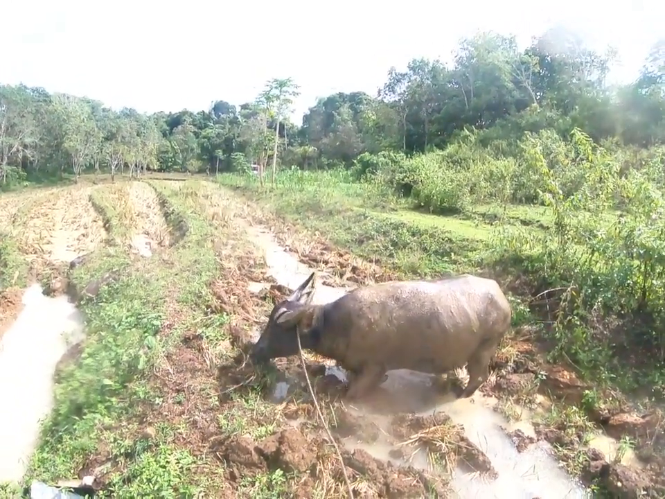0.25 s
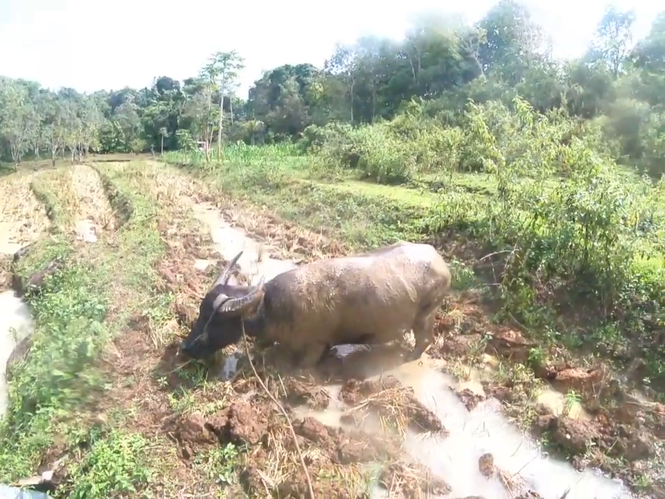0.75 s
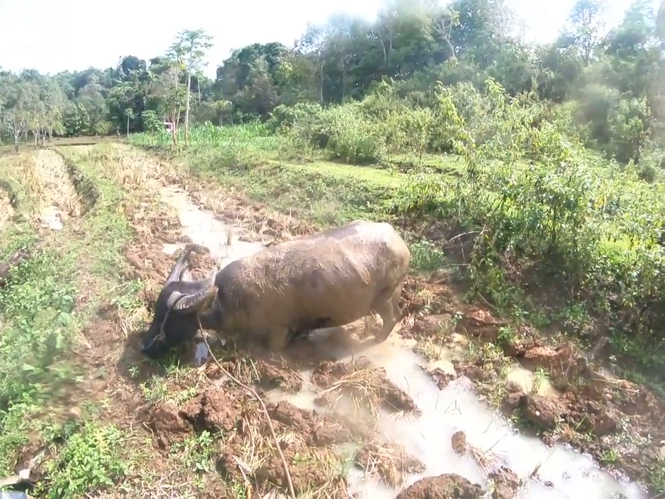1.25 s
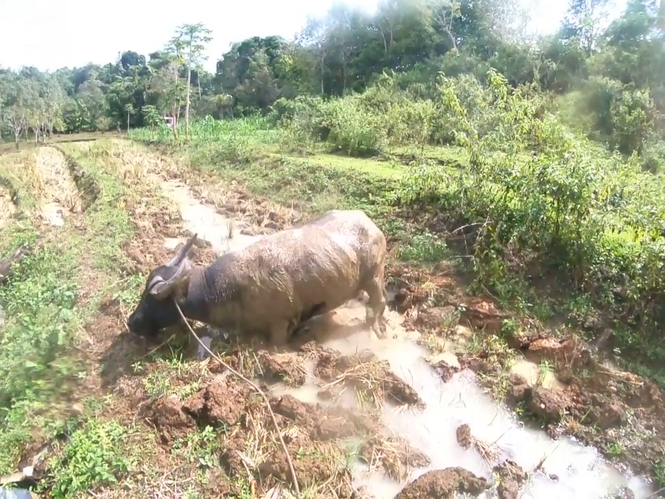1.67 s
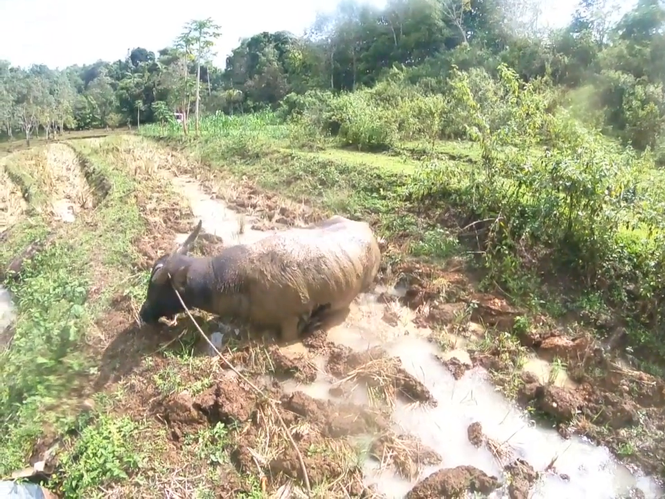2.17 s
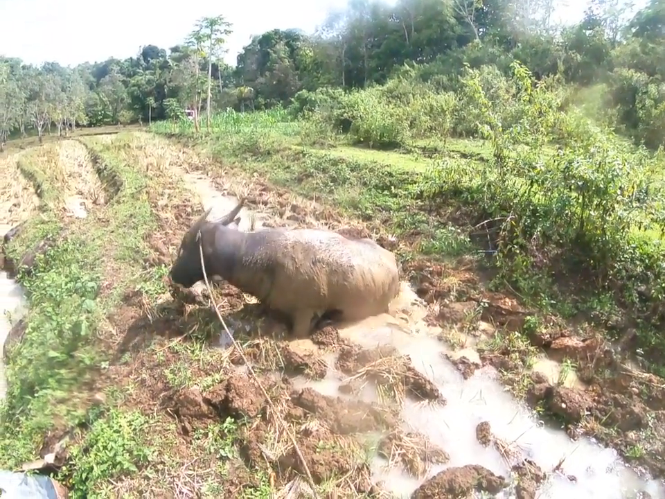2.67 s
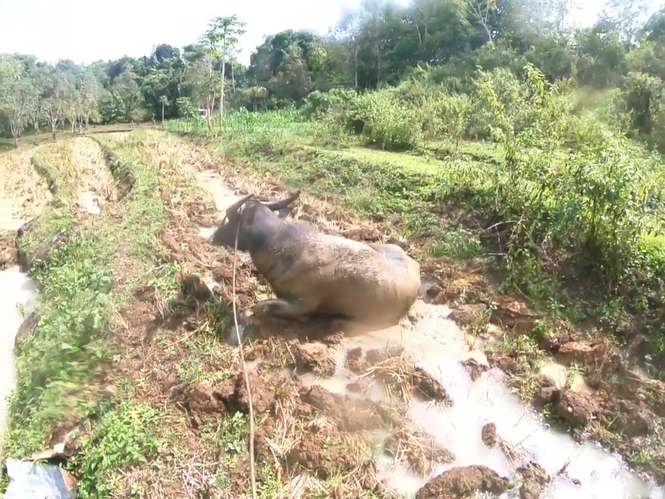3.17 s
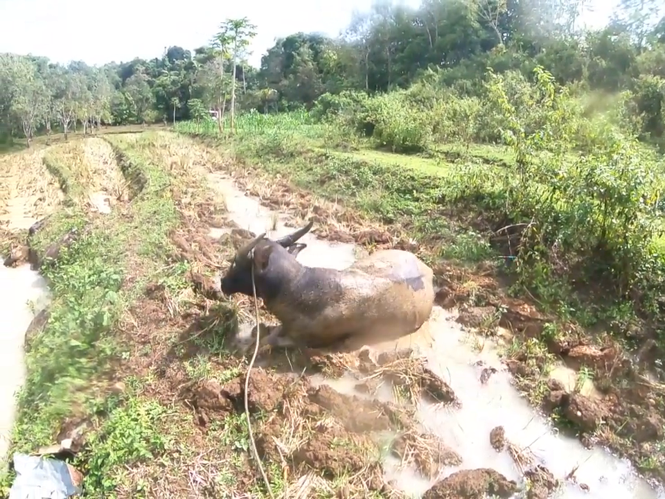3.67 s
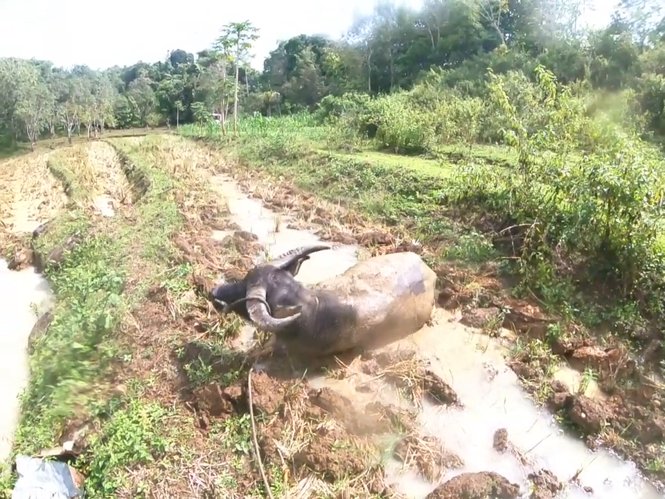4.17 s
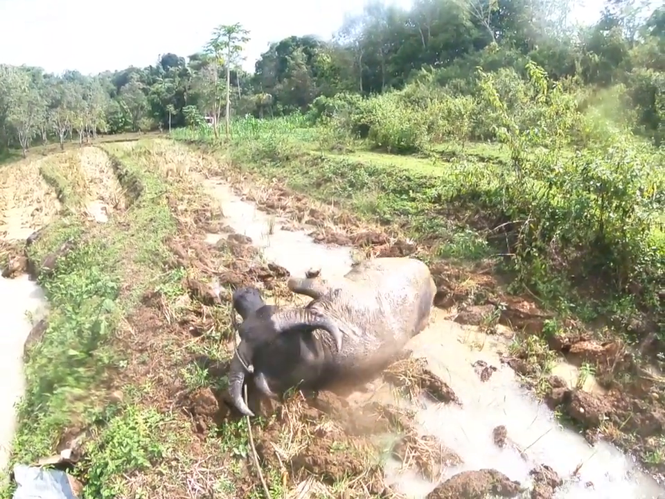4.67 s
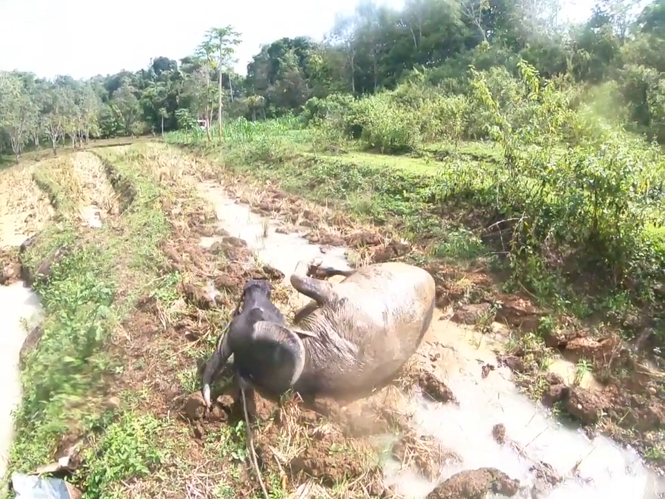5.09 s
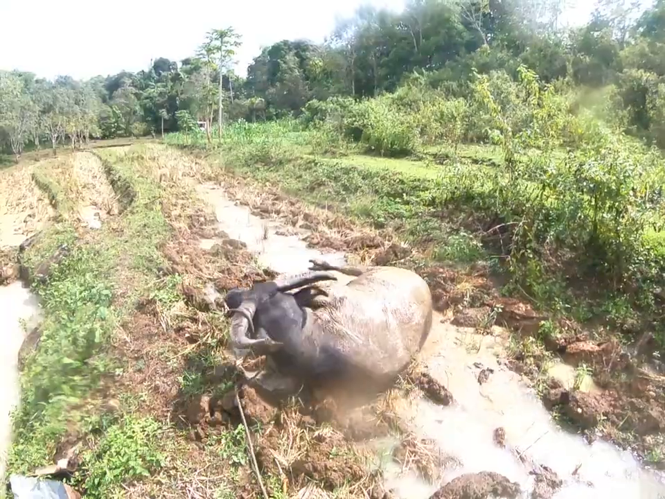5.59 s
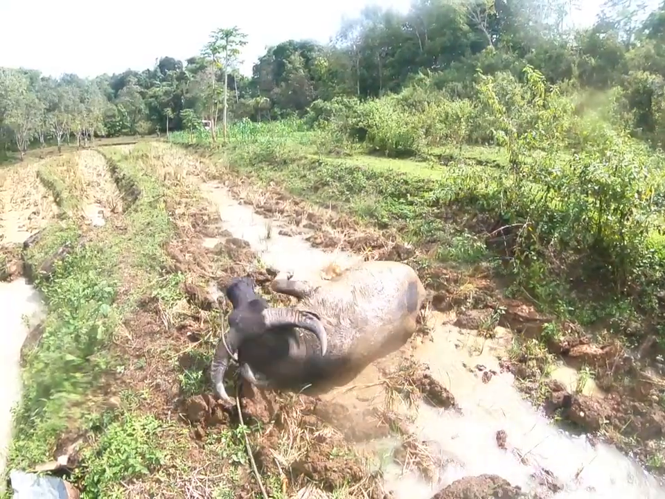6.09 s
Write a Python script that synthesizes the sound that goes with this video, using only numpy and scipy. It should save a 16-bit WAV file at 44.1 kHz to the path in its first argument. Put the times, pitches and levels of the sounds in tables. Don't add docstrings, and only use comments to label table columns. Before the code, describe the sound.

Heavy animal wallowing in shallow muddy water outdoors: churning slosh, sharp splashes, sucking plops and flung drops, with low wind buffeting.

```python
import sys
import numpy as np
from scipy import signal
from scipy.fft import rfft, irfft, next_fast_len
from scipy.io import wavfile
from scipy.ndimage import uniform_filter1d

SR = 44100
rng = np.random.default_rng(int(sys.argv[2]) if len(sys.argv) > 2 else 0)


def voltage_ratio(level):
    return 10 ** (np.asarray(level, float) / 20)


def digitize_waveform(pressure):
    field = np.atleast_2d(pressure).T
    bounded = np.clip(field, -1, 1)
    quanta = np.round(bounded * 32767).astype(np.int16)
    wavfile.write(sys.argv[1], SR, quanta)


N = 279594
SIZE = next_fast_len(N)
CLOCK = np.arange(N) / SR
BINS = np.fft.rfftfreq(SIZE, 1 / SR)


def evened(x):
    return x / np.sqrt(np.mean(x ** 2) + 1e-20)


def read(points, hz):
    f, value = np.transpose(points)
    return np.interp(np.log(hz + 1), np.log(f + 1), value)


def coloured(x, points):
    return evened(irfft(rfft(x, SIZE) * voltage_ratio(read(points, BINS)), SIZE)[:N])


def add(mix, s, sound):
    part = mix[..., max(round(s * SR), 0):][..., :sound.shape[-1]]
    part += sound[..., :part.shape[-1]]


def lumps(per_s):
    hz = BINS[:SIZE // 32 + 1]
    slow = rfft(rng.standard_normal(SIZE // 16)) / (1 + (hz / per_s) ** 2)
    slow = evened(irfft(slow, SIZE // 16))
    return np.interp(np.arange(N) / 16, np.arange(SIZE // 16), 2 * np.tanh(slow / 1.6))


SINK_DB = 13


def surges(base_db, s, db, rise_s, fall_s):
    u = CLOCK[::64, None] - s
    fade = np.where(u < 0, -u / rise_s, u / fall_s)
    power = voltage_ratio(2 * (db - SINK_DB * fade)).sum(1)
    return 10 * np.log10(np.interp(CLOCK, CLOCK[::64], power) + voltage_ratio(2 * base_db))


def bubble(hz, cycles, glide):
    u = np.arange(int(4 * cycles * SR / hz) + 8) * hz / SR / cycles
    shape = (1 - np.exp(-u * cycles / 0.9)) * np.exp(-2.4 * u ** 2.57)
    turns = cycles * (u + .5 * glide * np.minimum(u, 1.5) ** 2)
    return shape / shape.max() * np.sin(2 * np.pi * turns)


def swarm(low_hz, high_hz, cycles, per_s, spread_db, clump_db, count=16):
    born, kind = rng.random(N) < per_s / SR, rng.integers(0, count, N)
    loudness_db = spread_db * np.minimum(rng.exponential(1, N), 4) + clump_db * lumps(26.0)
    size = born * voltage_ratio(loudness_db)
    out = np.zeros(N)
    for k, hz in enumerate(np.geomspace(low_hz, high_hz, count)):
        grain = bubble(hz, cycles * rng.uniform(0.62, 1.71), rng.uniform(0, 0.26))
        grain = grain * np.sqrt(hz) / np.linalg.norm(grain)
        out += signal.oaconvolve(size * (kind == k), grain)[:N]
    return evened(out)


# (frequency [Hz], level [dB per Hz])
SLOSH_COLOUR = [(150, -30), (250, -2.5), (393, -7.5), (653, 6), (806, 0), (1450, 4.5), (1800, -5.5),
                (3500, -6.5), (4550, -35), (7700, -120)]
# (frequency [Hz], level [dB per Hz])
SPRAY_COLOUR = [(1060, -11), (1800, -0.5), (2120, -0.5), (2400, 0), (5320, 0), (7490, -7), (8580, -15.5),
                (9820, -13), (11700, -34.5), (14300, -35.5), (15600, -52)]
# (time [s], level [dB], spray over slosh [dB], length [s])
PLUNGES = [(0.633, -53, -2, 0.43), (1.365, -45, -15, 0.53), (1.379, -39.5, -9, 0.17),
           (1.812, -42, -6.5, 0.24), (2.452, -51.5, 14.5, 0.27), (2.553, -39.5, 2, 0.054),
           (3.705, -36, 2, 0.062), (4.111, -41, -8, 0.085), (4.48, -50, 0, 0.26), (4.664, -44.5, -1, 0.36),
           (4.961, -45, -1, 0.7), (5.875, -47, -1, 0.093), (5.905, -52.5, 13, 0.11)]
# (crest time [s], level [dB], spray over slosh [dB], length [s])
HEAVES = [(0.986, -48.5, 8, 0.096), (0.31, -64, -2, 0.34), (1.151, -55.5, 6.5, 0.14),
          (1.55, -40, -4.5, 0.12), (1.46, -50, -14, 0.066), (1.949, -36.5, -1.5, 0.067),
          (2.011, -37.5, 6, 0.039), (2.133, -45, 3.5, 0.17), (2.354, -43.5, -31, 0.27),
          (2.594, -52.5, 12, 0.22), (2.803, -38.5, -2, 0.11), (2.905, -35.5, -1, 0.1),
          (3.038, -40, 0.5, 0.26), (3.205, -46.5, 7.5, 0.22), (3.406, -45.5, 8, 0.059),
          (3.479, -40, 9.5, 0.029), (3.556, -40.5, -1, 0.28), (3.832, -44, 1.5, 0.45),
          (4.219, -43, -8.5, 0.15), (4.554, -46.5, 5, 0.042), (4.893, -50, -4, 0.043),
          (5.142, -42, -1.5, 0.037), (5.306, -57.5, 8.5, 0.31), (5.524, -68, -7, 0.36),
          (5.7, -42.5, -2.5, 0.42), (6.04, -43.5, -5, 0.3), (6.28, -37.5, 6, 0.15)]
PLUNGE_S = 0.0099
HEAVE_RISE = 0.78
TRICKLE_DB, MIST_DB = -62.5, -63.5
TICKS, BEADS = .26, .55


def churn():
    slosh = swarm(283.0, 3137, 5.4, 2600, 0.47, 2.44) + 0.92 * rng.standard_normal(N)
    spray = swarm(1536, 10960, 3.24, 5000, 0.52, 3.5) + 1.07 * rng.standard_normal(N)
    spray += TICKS * swarm(1340, 12600, 2.0, 480, 4.1, 3.3, count=6)
    spray += BEADS * swarm(1290, 6140, 5.3, 350, 1.35, 9.0, count=10)
    s, db, spray_db, length = np.transpose(PLUNGES + HEAVES)
    is_plunge = np.arange(len(s)) < len(PLUNGES)
    rise = np.where(is_plunge, PLUNGE_S, HEAVE_RISE * length)
    slosh_db = surges(TRICKLE_DB, s, db, rise, length)
    mist_db = surges(MIST_DB, s, db + spray_db + 0.049, rise, length)
    return voltage_ratio(slosh_db) * coloured(slosh, SLOSH_COLOUR) + voltage_ratio(mist_db) * coloured(spray, SPRAY_COLOUR)


# (time [s], left level [dB], right level [dB])
BREEZE = [
    (0, -52, -49),
    (.44, -49.5, -54.5),
    (1.06, -57, -55),
    (1.9, -49, -50),
    (3.9, -33.5, -41),
    (5.9, -44, -44),
    (6.34, -37.5, -32.5),
]
# (frequency [Hz], level [dB per Hz])
RUMBLE_COLOUR = [(7.1, -40), (12, -7.5), (38, 5), (81, 1), (189, -8), (348, -23), (393, -32), (700, -32.5),
                 (910, -64), (1540, -120)]
# (crest time [s], peak level at the windward port [dB], left over right [dB], length [s])
GUSTS = [(0.67, -42, 0, 0.052), (0.821, -30, 13.5, 0.059), (1, -46.5, -4, 0.052), (1.14, -32.5, 16, 0.076),
         (1.62, -36, 12, 0.2), (1.69, -24.5, 10, 0.48), (2.174, -25, 12, 0.2), (2.447, -23, 21, 0.045),
         (2.537, -24.5, 3, 0.045), (2.681, -25.5, 13, 0.025), (2.776, -30.5, 2.5, 0.11),
         (2.861, -26, 14, 0.13), (2.973, -31, -0.5, 0.15), (3.2, -31, 2.5, 0.19), (3.51, -28, 1.5, 0.31),
         (3.74, -28, 4, 0.11), (4.097, -22.5, 20, 0.065), (4.317, -36.5, -3.5, 1), (4.5, -36.5, 2, 0.25),
         (4.655, -30.5, -19, 0.02), (4.918, -31, 0, 0.22), (5.079, -29.5, -20, 0.067),
         (5.296, -31.5, -20, 0.13), (5.412, -28.5, 19, 0.092), (5.576, -31.5, 5, 0.27),
         (5.93, -35.5, -1, 0.43), (6.207, -27, 5, 0.058)]
# (time [s], peak level [dB], pitch [Hz], left over right [dB])
EDDIES = [(.205, -50, 170, 7), (0.31, -50, 190, -1), (0.501, -58, 180, 3), (0.653, -45, 192, -3),
          (0.72, -39, 150, 4), (0.954, -41, 200, -2), (0.814, -33, 130, 15), (1.087, -36, 150, 23),
          (1.102, -32, 131, 16), (1.541, -32, 74.6, 14), (1.656, -23, 113, 14), (1.679, -24, 75.4, 14),
          (1.708, -15.5, 107, 23), (1.738, -19, 162, 8), (1.777, -41, 88, 13), (1.877, -21.5, 142, 19),
          (1.979, -25.5, 175, 17), (2.03, -20, 119, 8), (2.155, -24, 85, 25), (0.796, -35, 110, 10),
          (2.668, -25, 50.4, 15), (2.777, -20, 55, 13), (2.95, -22, 73, 24), (3.2, -20, 69.4, 14),
          (3.45, -19.5, 75.5, 22), (3.558, -22.5, 76, 11), (3.716, -13.5, 82.5, 21),
          (4.062, -21.5, 108, 23), (4.088, -39, 78, 9), (4.645, -24.5, 71.6, -25), (5.289, -24, 84, -22),
          (5.41, -21, 94, 18), (5.451, -20.5, 74, 9), (5.555, -21.5, 71.5, 13), (5.625, -28, 72.4, 28),
          (2.87, -20.5, 76, 20), (3.104, -27, 55, 13)]
EDDY_LOSS_DB = 3


def breeze():
    out = []
    s, db, pan_db, length = np.transpose(GUSTS)
    when, *steady = np.transpose(BREEZE)
    shades = np.minimum(pan_db, 0), np.minimum(-pan_db, 0)
    for steady_db, shade_db in zip(steady, shades):
        port_db = surges(np.interp(CLOCK, when, steady_db), s, db + shade_db, length, length)
        air = coloured(rng.standard_normal(N), RUMBLE_COLOUR)
        upper = irfft(rfft(air, SIZE) * BINS ** 3 / (BINS ** 3 + 76.0 ** 3), SIZE)[:N]
        reach_db = 1.26 * (port_db + 27.5) + 4.8 * lumps(14.0)
        air = air + (voltage_ratio(reach_db) - 1) * upper
        out.append(voltage_ratio(port_db - 1.4 + 3.6 * lumps(30.5)) * air)
    out = np.array(out)
    for s, db, hz, pan_db in EDDIES:
        share = 1 / np.sqrt(1 + voltage_ratio([[-2 * pan_db], [2 * pan_db]]))
        push = rng.choice([-1., 1.], (2, 1))
        add(out, s - .003, 2 * share * voltage_ratio(db - EDDY_LOSS_DB) * push * bubble(hz, 1.29, -0.044))
    return out


# (frequency [Hz], level [dB per Hz])
FIELD_COLOUR = [(105, -16), (170, 5.5), (307, -3.5), (459, -18), (1300, -12.5), (6070, -12.5), (7130, -9.5),
                (10600, -24.5), (12000, -34), (15600, -44)]
FIELD_DB = -54


def field():
    hiss = coloured(rng.standard_normal(N), FIELD_COLOUR)
    return voltage_ratio(FIELD_DB - 7.0 + 0.22 * lumps(9.7)) * hiss


# (time [s], peak level [dB], pitch
# [Hz], length [cycles])
BUBBLES = [(0.957, -34, 2030, 26), (1.216, -30, 1070, 11), (1.393, -16.5, 1338, 5.5), (1.627, -29, 960, 11),
           (1.945, -42, 1520, 8.6), (1.9525, -21.5, 2100, 9.9), (1.998, -27, 2100, 11),
           (2.402, -28, 1380, 9.8), (2.441, -24, 1020, 8.8), (2.658, -25, 960, 7.9), (2.757, -26, 1450, 19),
           (2.811, -17, 903, 5), (2.984, -20, 1430, 9.7), (3, -17, 1235, 12), (3.042, -19, 1500, 6.8),
           (3.224, -26, 1410, 15), (3.483, -26, 2010, 7.3), (3.546, -18, 960, 5.9), (3.696, -25, 1410, 7.7),
           (3.797, -22.5, 1590, 15), (4.136, -22.5, 960, 7.2), (4.474, -28.5, 1450, 16),
           (4.654, -33, 1620, 14), (4.9887, -23.5, 1144, 12), (5.25, -18.5, 1578, 25), (5.677, -24, 1860, 12),
           (5.875, -19.5, 1003, 12), (6.191, -21, 1100, 4.8), (6.284, -17.5, 1650, 7.7),
           (.622, -40.5, 591, 39), (1.365, -27, 260, 4.2), (1.901, -28, 554, 16), (2.368, -27.5, 587, 7.4),
         (2.539, -21, 720, 4.3), (2.556, -17.5, 680, 3.5), (2.571, -19, 164, 1.1), (2.683, -24.5, 554, 8.2),
         (3.118, -27, 785, 8.2), (3.224, -26, 413, 5.1), (3.295, -30, 830, 13), (3.312, -25.5, 646, 4.2),
         (3.467, -23, 547, 3.1), (3.518, -29, 670, 23), (3.539, -20, 720, 6.5), (3.574, -33.5, 610, 37),
         (3.83, -29.5, 563, 11.6), (4.135, -21.5, 553, 1.3), (4.387, -28, 342, 4.8), (4.706, -30, 914, 11),
         (5.689, -33, 540, 4.5), (5.912, -22.5, 660, 8.2), (6.085, -23, 658, 9.2), (1.132, -35, 745, 8.4),
         (1.0, -32, 1090, 13), (1.655, -28, 337, 3.1), (1.668, -24, 435, 3.2), (1.705, -30, 298, 2.1),
         (1.74, -34, 333, 2), (0.039, -45, 400, 4.2), (4.21, -29, 300, 4.3), (3.29, -30.5, 293, 5.9),
         (1.781, -19.5, 256, 3), (5.4, -27, 553, 1.3), (5.452, -31, 250, 2.2),
           (.24, -41.5, 730, 8), (0.648, -37, 1420, 12), (.765, -40, 740, 8), (0.856, -40, 1420, 19),
             (1.093, -37, 1420, 12), (1.319, -42, 2160, 18), (1.3908, -25, 1173, 3.2),
             (1.3913, -22, 1820, 6.1), (1.402, -23, 1560, 9), (1.41, -35, 490, 9.2), (1.432, -32, 820, 4.9),
             (1.455, -32, 620, 6), (1.48, -33, 760, 4.8), (1.512, -27, 595, 4.9), (1.525, -31, 1430, 13),
             (1.547, -29, 820, 8.9), (1.562, -30, 590, 4), (1.574, -38, 1460, 14), (1.585, -33, 635, 7),
             (1.632, -35, 1570, 15), (1.68, -40, 1300, 7.9), (2.611, -27.5, 1380, 15),
             (3.01, -23, 1250, 6.5), (3.066, -30, 676, 2.8), (3.196, -24, 2220, 7.2),
             (3.197, -26, 900, 7.5), (3.264, -27, 1780, 9.6), (3.274, -30, 1550, 21),
             (3.361, -28.5, 1510, 11), (3.366, -26, 560, 5.2), (3.722, -23, 1210, 11),
             (3.728, -23, 1100, 7.1), (4.029, -23, 1860, 4.3), (4.122, -33, 1080, 5.1),
             (4.989, -22.5, 1510, 4.8), (5.239, -28, 1200, 14), (2.54, -14.5, 1450, 8.3),
             (2.459, -21, 1900, 3.2), (4.264, -34, 1120, 11), (4.282, -33, 930, 9.3), (4.29, -34, 1850, 10),
             (4.3, -35, 2270, 14), (4.664, -33.5, 2350, 15), (4.687, -29, 2920, 12),
             (4.709, -26.5, 1350, 6), (4.728, -34, 1550, 14), (4.847, -30, 1950, 9.2),
             (4.892, -36.5, 1680, 17), (5.2524, -27, 1730, 14)]
# (time [s], peak level [dB], pitch [Hz])
DRIPS = [(0.6612, -31.5, 2850), (0.765, -43, 1750), (0.844, -36.5, 3550), (1.186, -27.5, 2600),
         (1.3447, -27, 2620), (1.344, -32, 5000), (1.357, -32, 5300), (1.416, -34, 5300),
         (2.0105, -32, 4060), (2.017, -26, 2220), (2.4578, -23, 4710), (2.469, -34, 3860),
         (2.5446, -11.5, 4030), (2.574, -27, 4600), (3.2241, -19, 3580), (3.442, -28, 4300),
         (3.4852, -27, 4620), (3.487, -20, 3400), (3.537, -17, 5020), (3.574, -26, 2660),
         (3.616, -16, 4400), (5.298, -27, 3830), (6.0223, -32, 3180), (6.2755, -17, 5450)]
DRIP_CYCLES = 20.7


def plops():
    out = np.zeros(N)
    drips = [(*drip, DRIP_CYCLES) for drip in DRIPS]
    for s, db, hz, cycles in BUBBLES + drips:
        glide, late, other = rng.random(3)
        ring = voltage_ratio(db - 8.0) * bubble(hz, max(cycles, 1.5), 0.075 * glide)
        neighbour = bubble(hz * (1.09 + 0.31 * other), max(0.35 * cycles, 1.5), 0.084)
        add(out, s - .0007, ring)
        add(out, s + 0.0064 + 0.00367 * late, voltage_ratio(-13.0) * ring)
        add(out, s + 0.0037 * other, voltage_ratio(db - 14.5) * neighbour)
    return out


# (time [s], peak level [dB], dullness [dB an octave])
SLAPS = [(0.6615, -30, 5), (1.1822, -31, 0), (1.3433, -29, 0.5), (1.391, -28, 8), (1.994, -22, -3),
         (2.0105, -25, 4), (2.259, -25, -7), (2.468, -17.5, -7), (2.543, -11.5, 4.5), (2.574, -15.5, 0.5),
         (2.7857, -27, -10), (2.984, -18.5, 5.5), (2.816, -15, 0), (3.0415, -20.5, 2), (3.1775, -19.5, -16),
         (3.2242, -18.5, -1.5), (3.3862, -23, -1), (3.421, -24, -11), (3.484, -15.5, -0.5),
         (3.5397, -14, -5), (3.547, -9.5, 7.5), (3.573, -21.5, -6), (3.6986, -26, 10), (4.4907, -28, -6),
         (5.298, -23.5, -1), (6.0207, -25, -4), (6.276, -35, 10)]
# (time [s], peak level [dB], dullness [dB an octave])
SPATTER = [(0.768, -31.5, -0.5), (0.798, -30, -1), (0.8434, -33, -3), (0.927, -28, -5), (0.948, -27, -18),
           (0.9566, -22, 1), (0.964, -19.5, -2.5), (.9868, -34, -12), (0.999, -27, 3), (1.1237, -27, 11),
           (2.0556, -21, -15), (1.199, -25.5, -4.5), (1.282, -37, -7), (1.389, -26, 23.5), (1.496, -32, 2),
           (1.5455, -31, -9), (1.808, -42, 1), (0.626, -31, 8), (1.629, -34, -1), (2.7255, -33, -9),
           (2.839, -32, 3), (2.906, -24, 5), (2.935, -20, 8), (2.999, -13, 6), (3.126, -29, 6),
           (3.186, -14.5, -3), (3.258, -19, -4), (3.272, -16, -1.5), (0.1447, -35.5, -4), (3.351, -43, -5),
           (3.6482, -38, 6), (3.716, -28, 8), (3.7975, -27, -10), (3.805, -27, 6), (3.842, -20.5, -9),
           (3.857, -31, -12), (3.893, -47, -4), (4.022, -27, 0), (4.0743, -24, 3), (4.109, -30, -1),
           (4.139, -35, 1), (4.2007, -28, -8), (4.514, -28, -6), (4.6569, -33, -9), (4.845, -31, 8),
           (4.8803, -44, 6), (4.9676, -32, -8), (4.9994, -22, 1), (5.1077, -23.5, 2.5), (5.553, -31, -6),
           (5.6527, -26, 4), (5.675, -17, 2), (5.9076, -34, -2), (5.9793, -50, 10), (6.1311, -40, -9),
           (6.1755, -32, 6), (1.34, -27, 0), (2.456, -27, 0), (2.506, -21.5, 3), (2.5579, -21, 13),
           (4.575, -18.5, -1.5)]
SLAP_T60, SPATTER_T60 = 0.05, 0.022
SLAP_RISE_S, CRACK, CRACK_S = .0005, 1.2, .0018


def slaps():
    out, t = np.zeros(N), np.arange(4096) / SR
    hz = np.fft.rfftfreq(4096, 1 / SR)
    sheets = [(*row, SLAP_T60) for row in SLAPS]
    drops = [(*row, SPATTER_T60) for row in SPATTER]
    for s, db, dull_db, t60 in sheets + drops:
        noise, ragged = rng.standard_normal((2, 4096))
        colour = read(SPRAY_COLOUR, np.maximum(hz, 1900)) - dull_db * np.log2(hz / 4000 + 0.013)
        colour = colour - 30 * np.exp(-hz / 250) - 10.0 * (hz / 11000) ** 3
        burst = evened(irfft(rfft(noise) * voltage_ratio(colour)))
        ragged = voltage_ratio(2.7 * evened(uniform_filter1d(ragged, 60)))
        start = (1 - np.exp(-t / SLAP_RISE_S)) * (1 + CRACK * np.exp(-t / CRACK_S))
        add(out, s - .001, voltage_ratio(db - 14.5 - 60 * t / t60) * start * ragged * burst)
    return out


# (frequency [Hz], left over right [dB])
LEAN = [(60, 14), (120, -16), (240, 8.5), (480, -3), (950, -1), (1890, -8.5), (3770, 0.5), (7520, -1),
        (15000, -20)]
# (frequency [Hz], phase by which left leads [radians])
LEAD = [(0, -0.26), (1890, -0.51), (2930, -0.89), (4570, 0.76), (6000, -1.67), (7060, -1.1), (9220, -1.66),
        (15200, -0.91)]
# (frequency [Hz], phase [radians])
WANDER = [(300, 0.059), (800, 0.33), (1500, 0.5), (2200, 0.73), (3300, 0.2), (5500, 0.84), (8000, 0.79),
          (15000, 0.9)]
PATCHY_DB = 2.5


def ports(water, rest):
    hz, t, (z, sharp) = signal.stft(np.array([water, rest]), SR, nperseg=256, noverlap=192)
    chance = rng.standard_normal((len(t), len(hz), 2)).T
    smooth = uniform_filter1d(uniform_filter1d(chance, size=5, axis=1), size=9, axis=2)
    lag, tilt = (evened(c) for c in smooth)
    z = z * voltage_ratio(PATCHY_DB * tilt) + sharp
    wander = 0.79 * read(WANDER, hz)[:, None] * (0.45 * tilt + 1j * lag)
    lean = (voltage_ratio(read(LEAN, hz) / 2) * np.exp(1j * read(LEAD, hz) / 2))[:, None]
    both = np.array([z * (lean + wander), z * (1 / lean - wander)])
    return signal.istft(both, SR, nperseg=256, noverlap=192)[1][:, :N]


MIC_HZ = 11700


def scene():
    sharp = rfft(slaps() + plops(), SIZE) / (1 + (BINS / MIC_HZ) ** 8)
    sharp = irfft(sharp, SIZE)[:N]
    return ports(churn(), sharp + field()) + breeze()


def roll_off(x):
    return signal.sosfilt(signal.butter(12, 15710, fs=SR, output="sos"), x)


# (frequency [Hz], share of the time)
HOLES = [(10700, 0), (11300, .12), (12100, .4), (12800, .03), (13900, .02), (14500, .35), (15200, .82),
         (15700, .97)]


def record(dry):
    hz, t, z = signal.stft(dry, SR, window="cosine", nperseg=2048, noverlap=1024)
    starts = np.arange(0, len(hz), 16)
    power = np.add.reduceat((abs(z) ** 2).sum(0), starts, axis=0)
    judged = power * voltage_ratio(5 * rng.standard_normal((len(t), len(starts))).T)
    rank = judged.argsort(1).argsort(1) / len(t)
    keep = rank >= read(HOLES, hz[starts] + 170)[:, None]
    z = z * keep[np.arange(len(hz)) // 16]
    kept = signal.istft(z, SR, window="cosine", nperseg=2048, noverlap=1024)[1][:, :N]
    return roll_off(kept)


dry = scene()
out = record(dry)
digitize_waveform(out)
```